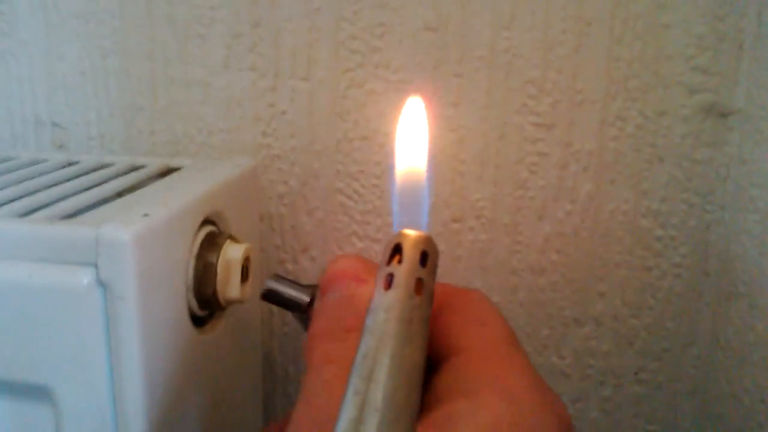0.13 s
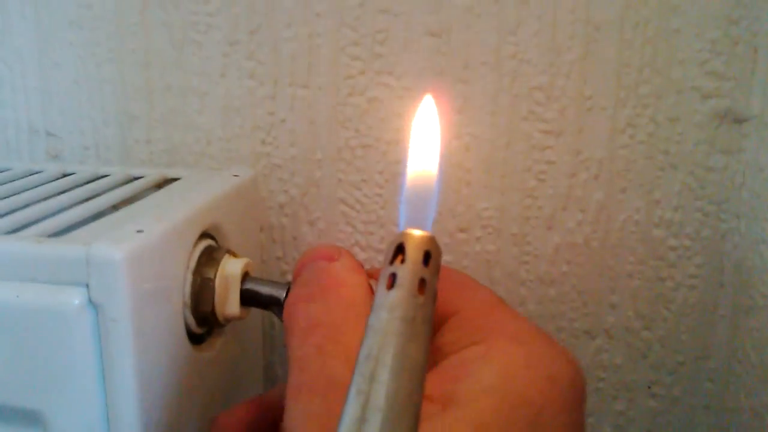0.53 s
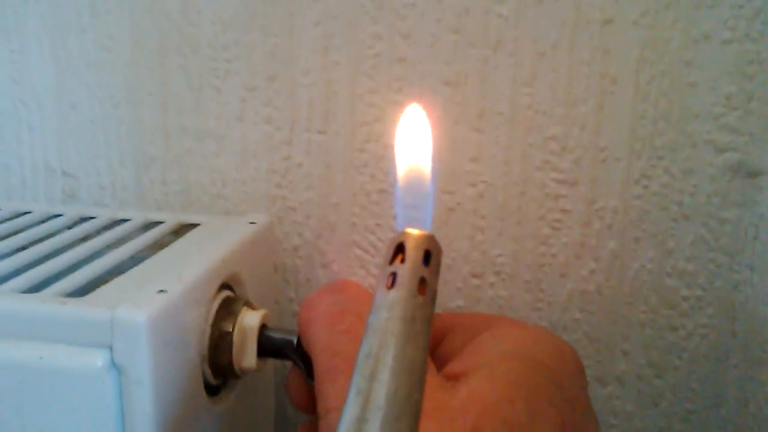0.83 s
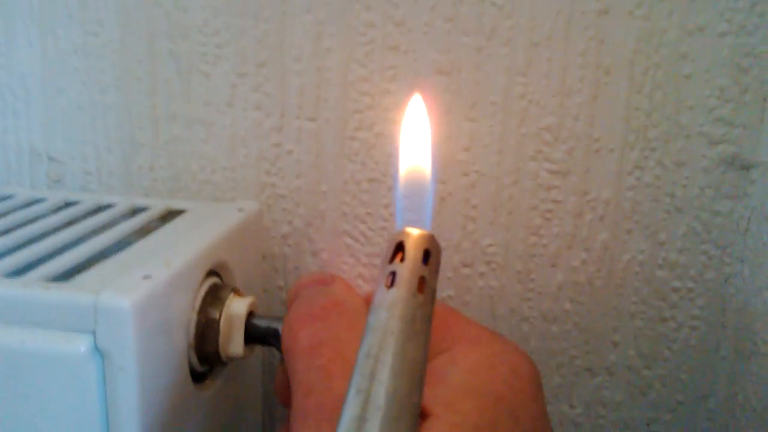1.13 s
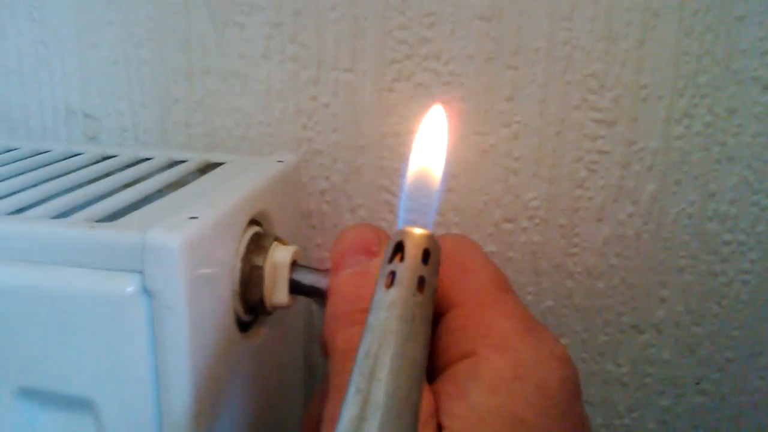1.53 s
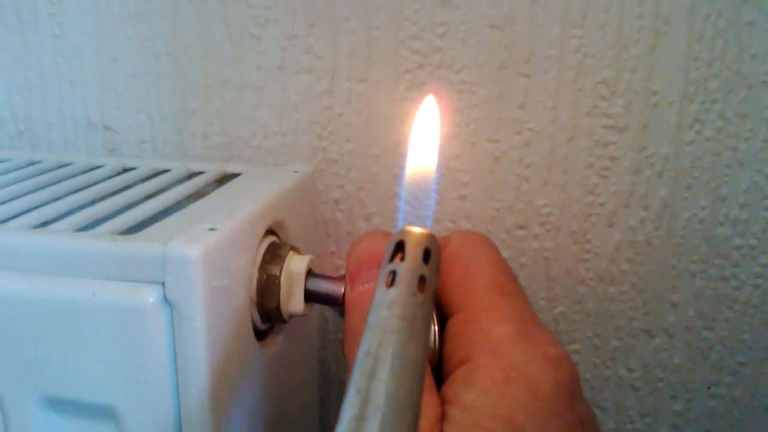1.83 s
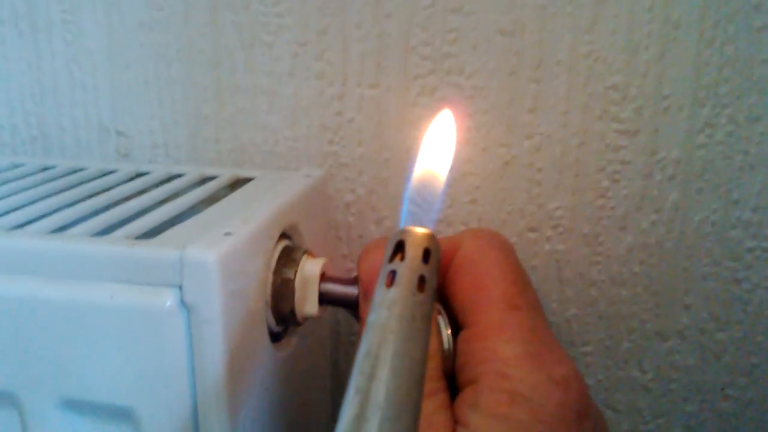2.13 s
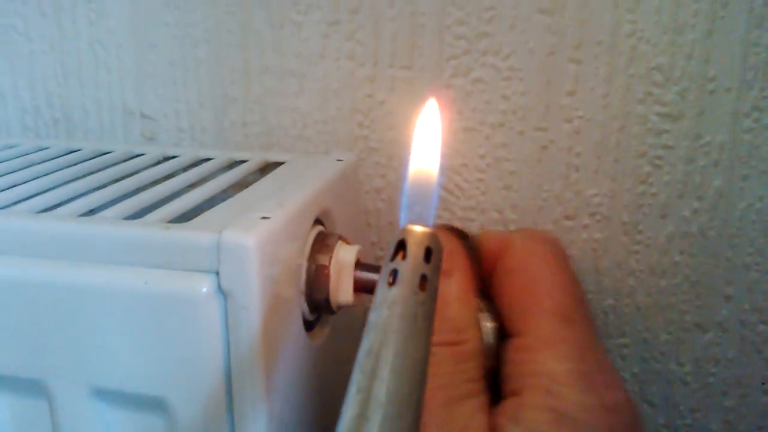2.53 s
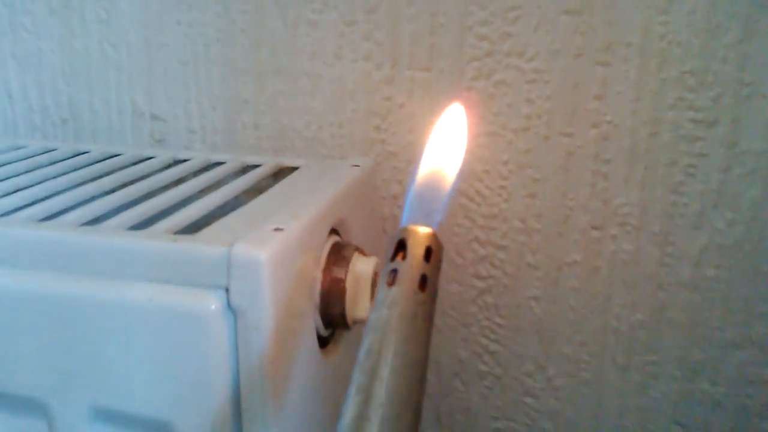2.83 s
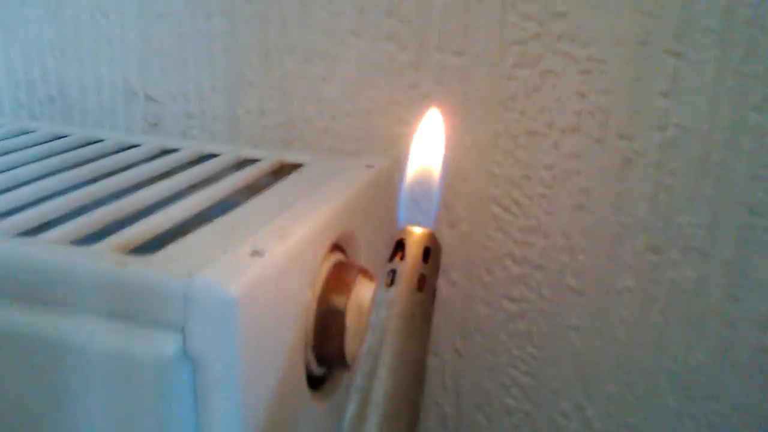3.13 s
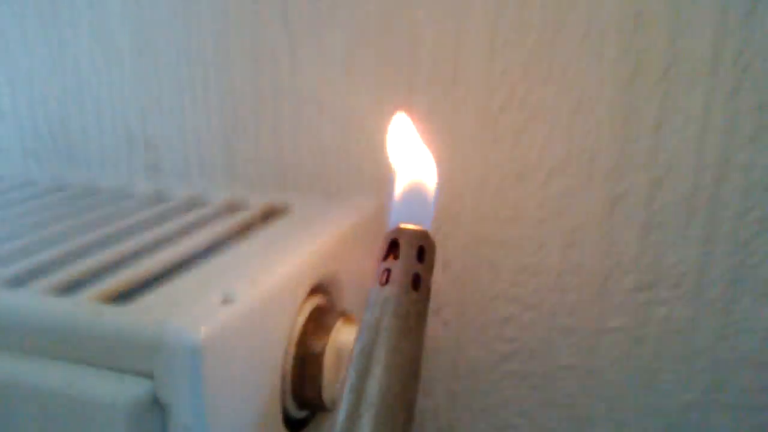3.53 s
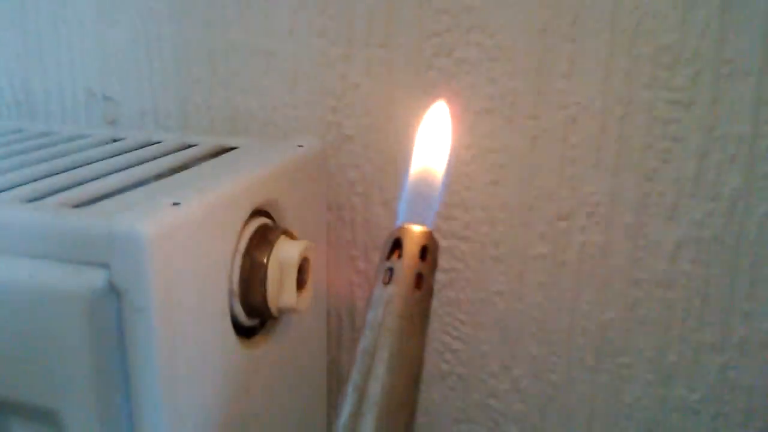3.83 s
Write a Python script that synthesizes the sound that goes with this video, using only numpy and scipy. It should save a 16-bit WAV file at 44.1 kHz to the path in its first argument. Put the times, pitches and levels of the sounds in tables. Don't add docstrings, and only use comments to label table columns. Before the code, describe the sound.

Sharp, bright gas hiss from a radiator valve after key ticks and rubbing; the jet catches with a fluttering low roar and pops, then hisses on. Close handheld microphone, quiet indoor room.

```python
import sys
import numpy as np
from scipy import signal
from scipy.fft import rfft, irfft
from scipy.io import wavfile

SR = 44100
rng = np.random.default_rng(int(sys.argv[2]) if len(sys.argv) > 2 else 0)


def transcribe(u):
    v = np.clip(np.atleast_2d(u).T, -1, 1)
    q = np.round(v * 32767).astype(np.int16)
    wavfile.write(sys.argv[1], SR, q)


def boost_factor(decibels):
    exponent = np.asarray(decibels, float) / 20
    return 10 ** exponent


N = 176400
TIME = np.arange(N) / SR
BIN_HZ = np.arange(N // 2 + 1) * SR / N
TOP_HZ = 15780


def white():
    return rng.standard_normal(N)


def rms_one(x):
    return x / np.sqrt(np.mean(x ** 2) + 1e-20)


def band(x, order, low_hz, high_hz):
    return signal.sosfilt(signal.butter(order, [low_hz, high_hz], "band", fs=SR, output="sos"), x)


def fade(t, t60):
    return boost_factor(-60 * t / t60)


def in_time(rows):
    s, db, *shares = np.transpose(rows)
    inside = (TIME >= s[0] - 0.005) * (TIME <= s[-1] + 0.005)
    level = boost_factor(np.interp(TIME, s, db)) * inside
    return [level] + [boost_factor(np.interp(TIME, s, share)) for share in shares]


def drift(rate_hz):
    r = np.exp(-2 * np.pi * rate_hz / SR)
    wander = signal.lfilter([1], [1, -2 * r, r * r], rng.standard_normal(N + SR))
    return rms_one(wander[SR:])


def humps(hz, peaks):
    return sum(boost_db / (1 + (2 * (hz - peak_hz) / width) ** 2) for peak_hz, width, boost_db in peaks)


def colour(x, spectrum, peaks=(), patchy_db=0.0, patch_hz=12, count=1):
    hz = np.arange(1, N // 2 + 2) * SR / N
    f, db = np.transpose(spectrum)
    octaves_outside = np.maximum(np.log2(f[0] / hz), 0) + np.maximum(np.log2(hz / f[-1]), 0)
    shape = np.interp(np.log(hz), np.log(f), db) - 24 * octaves_outside
    bins = rfft(x) * boost_factor(shape + humps(hz, peaks))
    if not patchy_db:
        return rms_one(irfft(bins, N))
    top = int(count * np.log2(min(f[-1], SR / 2) / f[1]))
    place = np.clip(count * np.log2(hz / f[1]), 0, top)
    out = np.zeros(N)
    for k in range(top + 1):
        one_band = irfft(bins * np.clip(1 - abs(place - k), 0, 1), N)
        out += one_band * boost_factor(patchy_db * drift(patch_hz))
    return rms_one(out)


# time in seconds, level in dB.
MURMUR_LEVEL = [(0, -48), (.3, -48), (.55, -51.5), (.68, -52), (.76, -51), (.8, -46.5), (1.15, -49.5),
                (1.3, -55.5), (1.45, -53.5), (1.8, -62.5), (2.6, -61), (2.7, -51), (2.82, -48.5)]
# pitch in Hz, strength in dB per Hz.
MURMUR_COLOUR = [(120, -27), (200, -2.5), (450, -9), (850, -8.5), (1300, -16.5), (2800, -15),
                 (11400, -19.5), (15800, -27)]
# time in seconds, level in dB.
RUMBLE_LEVEL = [(0, -56), (.74, -52), (.8, -46), (1.5, -54), (2.0, -56), (3.0, -56.5), (3.3, -51.5),
                (4.0, -54)]
# pitch in Hz, strength in dB per Hz.
RUMBLE_COLOUR = [(8.8, -7), (15, 15), (76, 9), (150, 11.5), (600, -12.5), (780, -55), (1320, -120)]


def room():
    s, db = np.transpose(MURMUR_LEVEL)
    murmur = boost_factor(np.interp(TIME, s, db)) * colour(white(), MURMUR_COLOUR, patchy_db=1.2)
    unsteady = boost_factor(1.5 + 0.29 * drift(2.7))
    rumble = in_time(RUMBLE_LEVEL)[0] * unsteady * colour(white(), RUMBLE_COLOUR)
    circuit_hiss = boost_factor(-76) * white()
    whine_hz, whine_db, dip_db, dip_rate_hz = 11715, -59, -14, 22
    dip = np.clip(-3 - 3 * drift(dip_rate_hz), 0, 1)
    whine = boost_factor(whine_db + dip_db * dip) * np.sin(2 * np.pi * whine_hz * TIME)
    return murmur + rumble + circuit_hiss + whine


# time in seconds, level in dB.
RUB_LEVELS = [
    [(0, -39.5), (.13, -38), (.22, -40.5), (.29, -48.5), (.37, -71)],
    [(.8, -52), (.85, -48.5), (.88, -35.5), (.96, -39), (1.005, -41), (1.02, -67), (1.06, -69)],
    [(2.81, -59), (2.86, -36.5), (2.97, -37), (3.04, -30.5), (3.12, -40.5), (3.39, -49.5)],
]
# pitch in Hz, strength in dB per Hz.
FIRST_RUB_COLOUR = [(88, -44), (150, -22), (221, 6.5), (1220, -10), (2860, -7.5), (4060, -5),
                    (15500, -10.5)]
SECOND_RUB_COLOUR = [(88, -34), (150, 2), (1090, -9), (2100, -14), (3980, -14), (5440, -8.5),
                     (15500, -17.5)]
THIRD_RUB_COLOUR = [(59, -45), (100, -8), (219, 9.5), (478, 0.5), (837, -2), (1120, -7.5), (3400, -0.5),
                    (4420, -5), (7480, -120)]
# pitch in Hz, width in Hz, boost in dB.
RUB_RINGING = [
    [(848, 76, 11.5), (1950, 250, 10), (2820, 450, 13.5)],
    [(2150, 540, 15), (3060, 1000, 16.5), (5200, 1700, 12.5), (8600, 960, 11)],
    [(860, 190, 9), (2300, 310, 6.5)],
]


def rubs():
    colours = (FIRST_RUB_COLOUR, SECOND_RUB_COLOUR, THIRD_RUB_COLOUR)
    out = np.zeros(N)
    for rows, tone, peaks in zip(RUB_LEVELS, colours, RUB_RINGING):
        out += in_time(rows)[0] * colour(white(), tone, peaks, patchy_db=2.5, patch_hz=18, count=3)
    return out


# start in seconds, peak in dB, ring pitch in Hz, share of the crack in dB.
TICK_EVENTS = [(.348, -35, 3000, -15), (.381, -35.5, 5100, 15.5), (0.389, -19, 944, -22),
               (0.493, -25.5, 6600, 5), (0.4987, -16, 4460, -12), (0.882, -24, 2980, -16),
               (0.998, -20, 5340, 1), (1.053, -16, 2300, -21), (1.058, -23, 935, -20),
               (1.227, -35, 2780, -21), (1.257, -36.5, 2150, -16), (1.306, -56, 7000, 20),
               (1.427, -32, 5500, 5), (1.438, -19, 8600, -5), (1.92, -56, 5000, 4),
               (2.677, -15.5, 3300, -15), (3.011, -15, 2300, -34), (3.044, -14, 2550, -9),
               (3.058, -15, 2460, -6), (3.425, -30, 1595, 12), (3.433, -13.5, 1380, -7),
               (3.443, -7.5, 283, -30), (3.485, -0.5, 522, -30), (3.519, -17, 2000, -6),
               (3.552, -5.5, 343, -30), (3.624, -10.5, 221, -30), (3.573, -16.5, 4060, -3),
               (3.634, -20, 2100, -12), (3.753, -18, 2530, 3), (3.821, -31, 1230, -11),
               (3.953, -5, 2810, -18), (3.9536, -4.5, 6160, -3.5), (3.971, -21.5, 2500, 11.5)]


def ticks():
    ring_cycles, crack_t60_s = 36, 0.008
    out = np.zeros(N + SR)
    t = np.arange(SR // 10) / SR
    for s, db, hz, crack_db in TICK_EVENTS:
        tones = np.sin(2 * np.pi * hz * t) + 0.5 * np.sin(2 * np.pi * hz * 1.126 * t)
        swell = np.minimum(t * hz / 4, 1)
        ring = 1.07 * fade(t, ring_cycles / hz) * swell * tones
        noise = rng.standard_normal(len(t))
        crack = 0.81 * band(noise, 1, hz / 3, min(2.2 * hz, TOP_HZ)) * fade(t, crack_t60_s)
        out[int(s * SR):][:len(t)] += boost_factor(db) * (ring + boost_factor(crack_db) * crack)
    return out[:N]


# start in seconds, peak in dB, lowest pitch in Hz, highest pitch in Hz, t60 in seconds.
KNOCK_EVENTS = [(0.381, -32.5, 700, 4850, 0.13), (0.482, -37, 2610, 8050, 0.13),
                (0.4904, -22, 2970, 7700, 0.095), (0.4938, -29.5, 870, 2870, .12),
                (0.77, -33, 174, 1150, 0.16), (.771, -36, 1500, 5500, .1), (1.051, -22, 685, 5200, 0.15),
                (1.425, -35.5, 603, 4500, 0.18), (2.653, -39.5, 397, 2010, 0.23),
                (2.674, -25, 390, 3600, 0.12), (3.929, -27, 5500, 7700, 0.2),
                (3.942, -14.5, 5440, 7540, 0.1)]


def knocks():
    rise_s, tail_t60_s, tail_db = 0.0009, 0.4, -11
    thud_db, thud_low_hz, thud_high_hz = -8, 48, 700
    out = np.zeros(N + SR)
    t = np.arange(SR // 2) / SR
    for s, db, low_hz, high_hz, t60 in KNOCK_EVENTS:
        rattle = rms_one(band(rng.standard_normal(len(t)), 5, low_hz, high_hz))
        knock = rattle * (fade(t, t60) + boost_factor(tail_db) * fade(t, tail_t60_s))
        if low_hz < 2500:
            thud = rms_one(band(rng.standard_normal(len(t)), 5, thud_low_hz, thud_high_hz))
            knock += boost_factor(thud_db) * thud * fade(t, tail_t60_s)
        out[int(s * SR):][:len(t)] += boost_factor(db - 8.5) * (1 - np.exp(-t / rise_s)) * knock
    return out[:N]


# time in seconds, level in dB, share of the dull part
# in dB.
GAS_LEVELS = [
    [(1.5, -64, 3), (1.535, -43, -7), (1.61, -43, -5.5), (1.64, -37, -5), (1.756, -37, -2.5),
     (1.79, -67, 3)],
    [(2.15, -74, 11), (2.19, -50.5, 5), (2.21, -40.5, -2), (2.29, -38.5, 0), (2.53, -30, -3.5),
     (2.57, -23, -7.5), (3.0, -20, -15), (3.42, -22, -11.5), (3.44, -28, -31), (3.59, -31.5, -21),
     (3.62, -26, -17.5), (3.76, -27, -8), (3.84, -19.5, -17.5), (4.0, -19.5, -18)],
]
# pitch in Hz, strength in dB per Hz.
BRIGHT_COLOUR = [(3530, -56), (6000, -11), (8100, -5.5), (8670, -1.5), (9450, -2.5), (11400, 2),
                 (15800, 0.5)]
# pitch in Hz, strength in dB per Hz.
DULL_COLOUR = [(1200, -29.5), (2200, -8.5), (2900, -1), (3600, -5), (4300, 5), (5100, 2), (6000, -8.5),
               (8500, -1.5)]
# time in seconds, stage number.
MOUTH_STAGE = [
    (1.8, 0),
    (2.1, 1),
    (2.6, 1),
    (2.72, 2),
    (2.98, 2),
    (3.1, 3),
    (3.42, 3),
    (3.6, 4),
]
# pitch in Hz, width in Hz, boost in dB.
MOUTH_HUMPS = [
    [(3420, 500, 7.5), (5360, 500, -4), (6640, 400, -5), (7840, 400, -4), (8600, 500, 6.5), (9400, 500, -1),
     (11500, 640, 3.5), (13200, 370, 6)],
    [(1870, 700, -3.5), (3900, 160, -10), (5900, 700, -6.5), (7040, 600, 2), (7700, 300, -8),
     (9950, 350, -7), (11070, 600, 6.5), (12600, 300, 4), (14900, 400, 5)],
    [(4500, 1700, -2), (5900, 520, 7.5), (8650, 400, -1), (10160, 500, -4.5), (10900, 440, 3),
     (14500, 400, 6), (15300, 600, -7)],
    [(3300, 890, -8), (4720, 400, -7.5), (5500, 440, 8), (6300, 300, -1), (6630, 320, 4), (8700, 360, 0.5),
     (9400, 500, 2), (11200, 940, 3), (15200, 700, -2)],
    [(3040, 530, 7), (4900, 270, 5.5), (7700, 770, -8), (8500, 830, 3.5), (9800, 300, -1), (14700, 700, 3),
     (15600, 600, -5)],
]
# time in seconds, level in dB.
LIT_LEVEL = [
    (3.6, -39),
    (3.64, -31.5),
    (3.71, -26),
    (3.76, -29.5),
    (3.84, -50),
]
# pitch in Hz, strength in dB per Hz.
LIT_COLOUR = [(2650, -46), (4500, -15), (5940, 1.5), (6700, -4.5), (8240, 3.5), (10000, -5), (13000, -47),
              (22000, -120)]


def jet():
    patchy_db, patch_hz = 2.2, 5
    bright = colour(white(), BRIGHT_COLOUR, (), patchy_db, patch_hz, count=12)
    dull = colour(white(), DULL_COLOUR, (), patchy_db, patch_hz, count=7)
    airy_hz, full_flow_db = 12900, -35.5
    soft = signal.sosfiltfilt(signal.butter(4, airy_hz, fs=SR, output="sos"), bright)
    gas = np.zeros(N)
    for rows in GAS_LEVELS:
        level, share = in_time(rows)
        airy = np.clip(level / boost_factor(full_flow_db), 0, 1) * (bright - soft)
        gas += level * (soft + airy + share * dull)

    bins = rfft(gas)
    stage = np.interp(TIME, *np.transpose(MOUTH_STAGE))
    shaped = np.zeros(N)
    for k, peaks in enumerate(MOUTH_HUMPS):
        blend = np.clip(1 - abs(stage - k), 0, 1)
        shaped += blend * irfft(bins * boost_factor(humps(BIN_HZ, peaks)), N)
    return shaped + in_time(LIT_LEVEL)[0] * colour(white(), LIT_COLOUR)


# time in seconds, roar in dB, share of crackle in dB, share of the upper roar in dB.
FLARE_LEVELS = [
    (3.395, -59, 4, -18),
    (3.412, -30, -16, -14),
    (3.424, -7.5, -26.5, -10),
    (3.46, -13, -17, 0),
    (3.52, -15, -5.5, 1),
    (3.575, -20, -5.5, 7),
    (3.6, -14.5, -21, -9),
    (3.72, -23, -22.5, -5),
    (3.95, -44, -20, -10.5),
]
# pitch in Hz, strength in dB per Hz.
ROAR_COLOUR = [(40, -11), (90, -7.5), (140, 1.5), (350, 5), (600, -1.5), (780, -5), (920, -18.5),
               (1300, -27)]
# pitch in Hz, strength in dB per Hz.
CRACKLE_COLOUR = [(1000, -12), (1170, 5.5), (2300, 4), (2900, -2), (3150, -17), (3900, -7.5), (4400, -12),
                  (5500, -12)]
# pitch in Hz, width in Hz, boost in dB.
PANEL_HUMPS = [(138, 18, 4.5), (225, 20, -0.5), (288, 16.5, 7.5), (370, 14, 5), (528, 17, 5.5),
               (610, 20, 9.5), (1160, 70, 3), (1380, 34, 6)]


def ignition():
    level, crackle_share, upper_share = in_time(FLARE_LEVELS)
    flutter_db, flutter_hz, pops_per_s = 1.5, 59, 920
    flutter = boost_factor(flutter_db * drift(flutter_hz))

    roar = colour(white(), ROAR_COLOUR, PANEL_HUMPS)
    low_band = signal.butter(2, [60, 400], "band", fs=SR, output="sos")
    low = signal.sosfiltfilt(low_band, roar)
    whoomph = rms_one(flutter * (low + upper_share * (roar - low)))

    pop_here = rng.random(N) < pops_per_s / SR
    pops = pop_here * white() * boost_factor(1.3 * rng.exponential(1, N))
    pops += 0.19 * white()
    crackle = rms_one(flutter * colour(pops, CRACKLE_COLOUR, PANEL_HUMPS))
    return level * (whoomph + crackle_share * crackle)


def scene():
    return (room() + rubs() + ticks() + knocks() + jet() + ignition())[None]


def band_limit(x):
    return signal.sosfilt(signal.butter(12, 17050, fs=SR, output="sos"), x)


def record(dry):
    limit = 1
    bins = rfft(limit * np.tanh(dry / limit))
    top_cut = np.clip((TOP_HZ + 30 - BIN_HZ) / 150, 0, 1) ** 2
    return band_limit(irfft(bins * top_cut, N))


dry = scene()
out = record(dry)
transcribe(out)
```